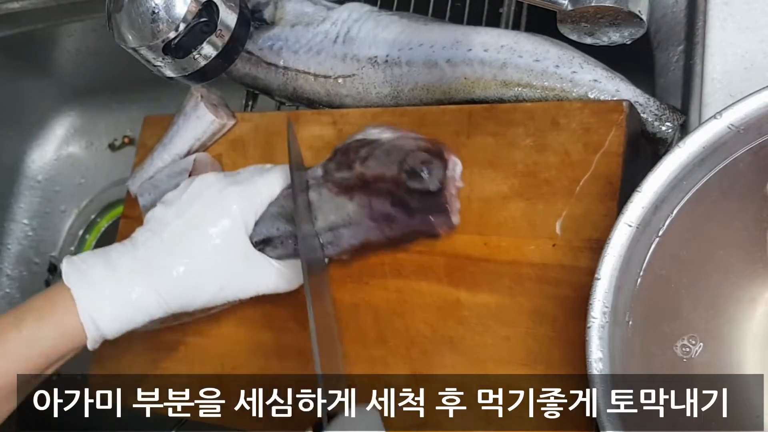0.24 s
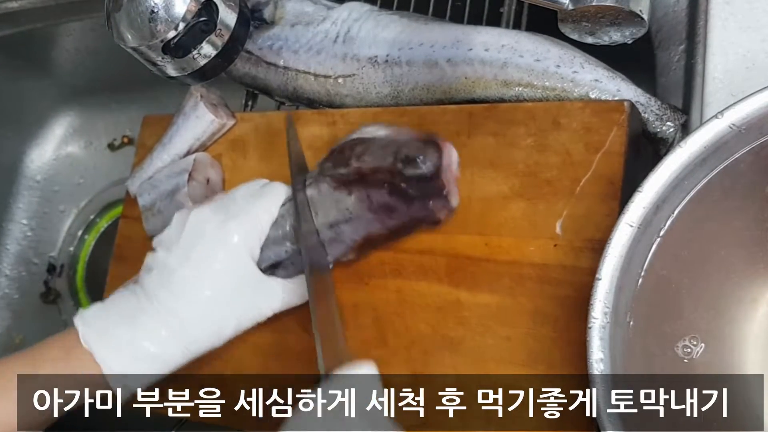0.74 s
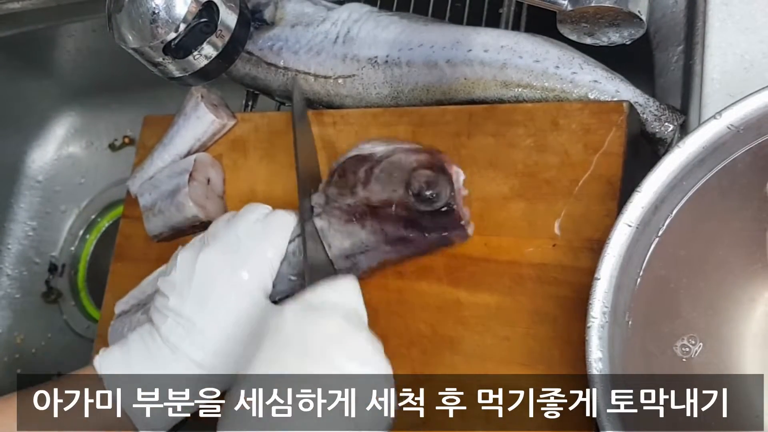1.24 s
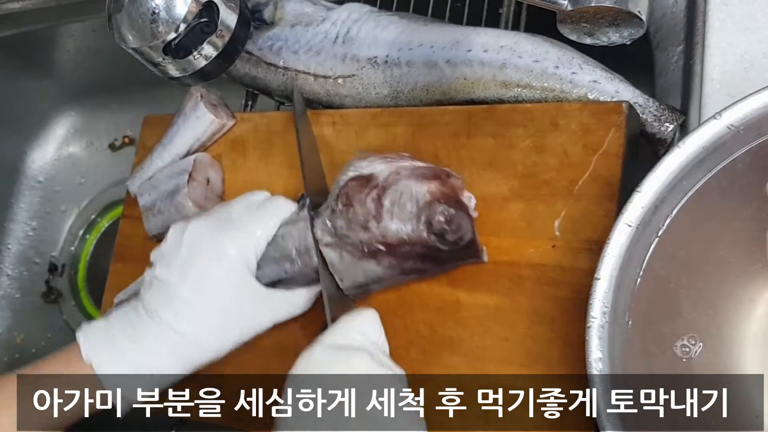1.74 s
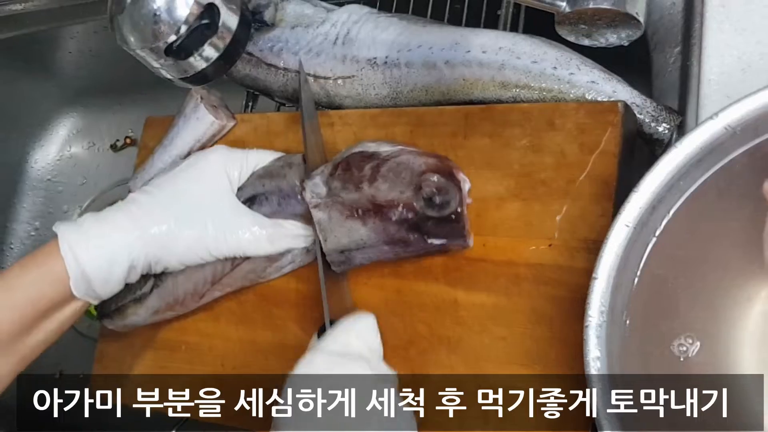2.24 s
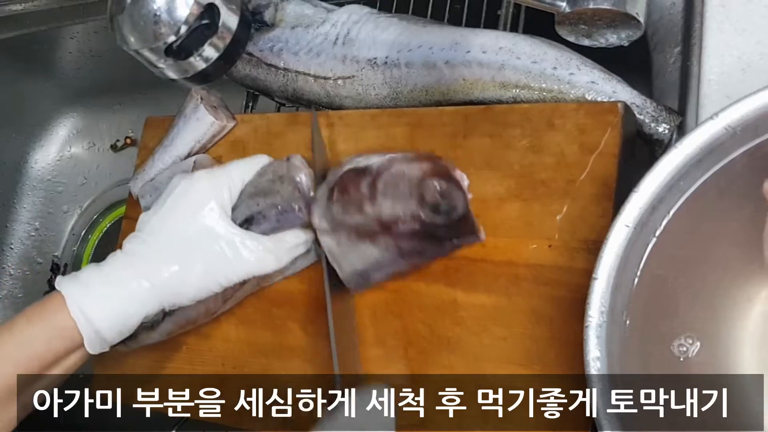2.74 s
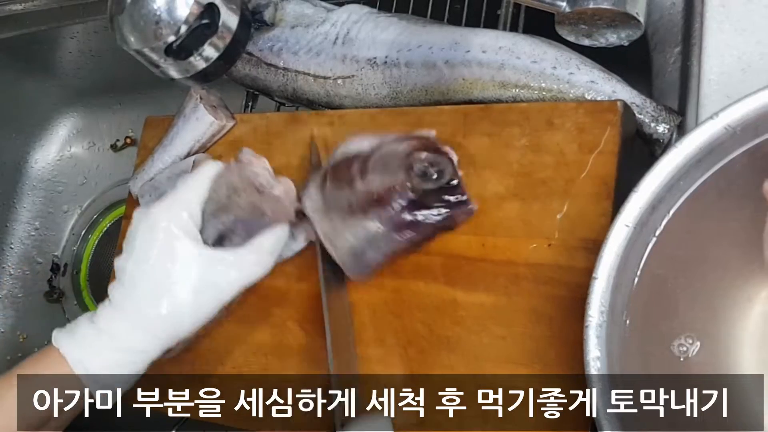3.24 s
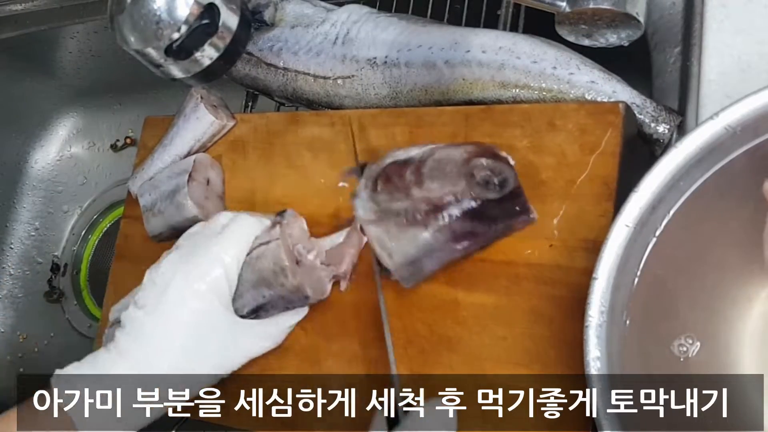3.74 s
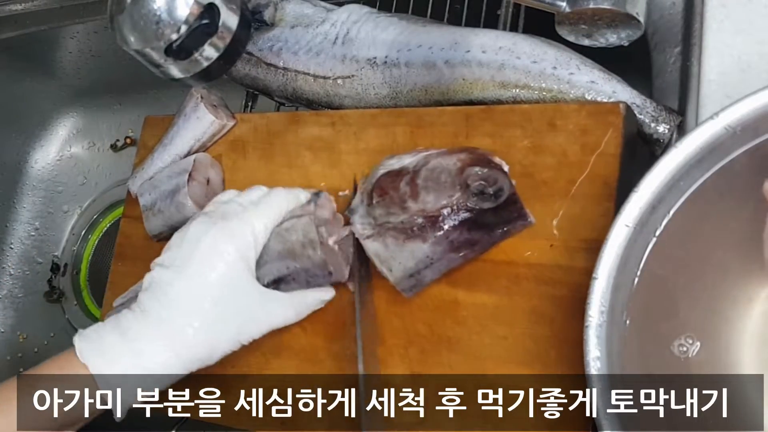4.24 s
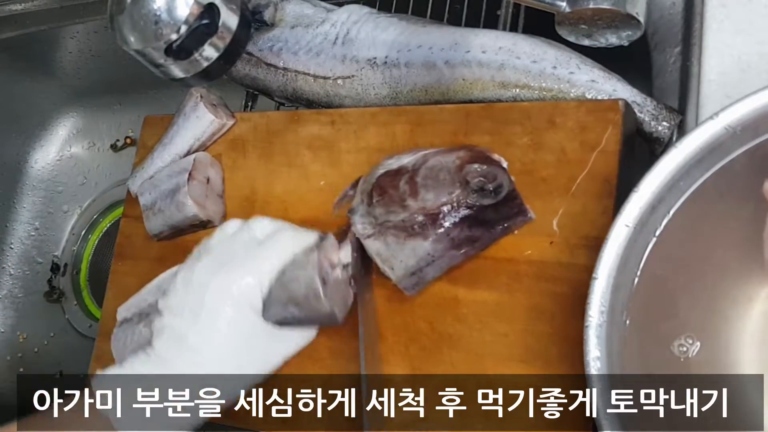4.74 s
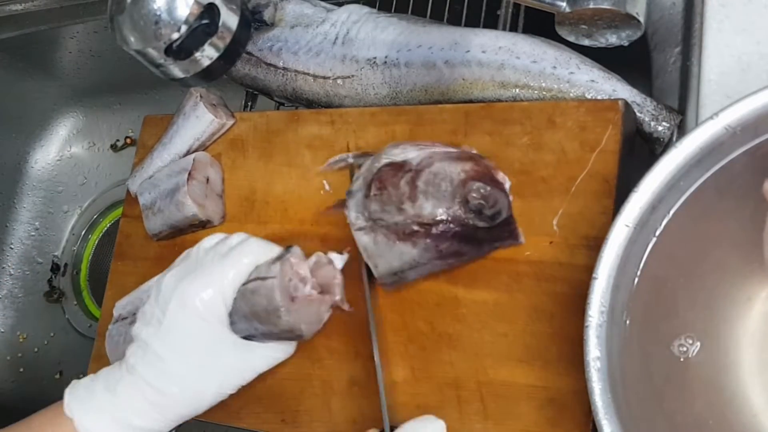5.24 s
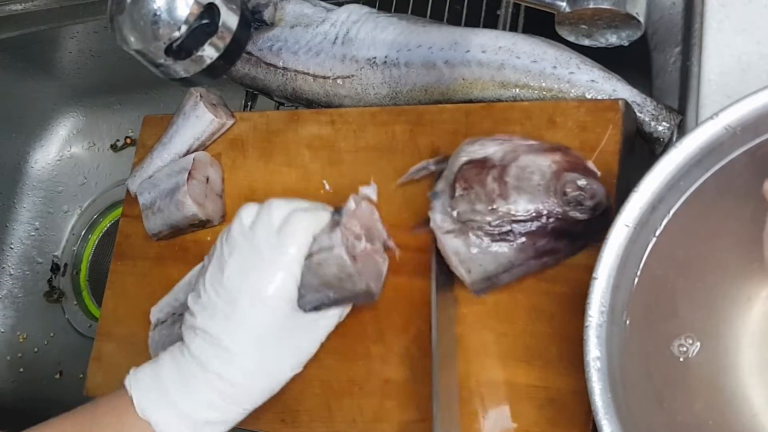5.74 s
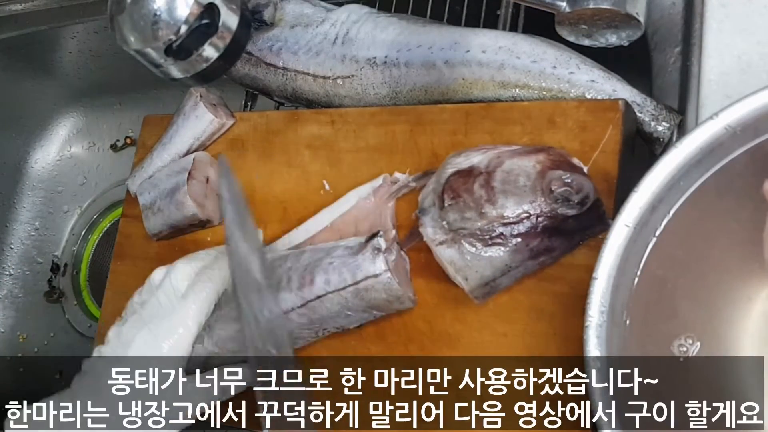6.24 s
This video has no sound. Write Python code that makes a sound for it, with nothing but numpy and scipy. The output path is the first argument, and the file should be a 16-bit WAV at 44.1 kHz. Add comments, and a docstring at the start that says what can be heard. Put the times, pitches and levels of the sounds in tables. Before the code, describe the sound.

Very close in a tiled kitchen, a knife works through a fish on a wooden board over a sink. Wet, gritty strokes rasp and hiss, bones crack sharply around one and a half and two seconds, then hollow knocks and low rubbing drags take over. After a last thump near five seconds it thins to faint scrapes and quiet air.

```python
"""A kitchen knife saws through a thawed fish on a wooden board laid over a steel sink, close to two microphones.
The slot round the blade sings and crunches through the board modes; wet skin hisses as unsteady noise.
Bones and scales snap as short noise bursts, and blows excite the board's resonances.
The fish drags on the wood as low-passed friction and rubbed tones.
A tiled kitchen answers snaps and knocks with decaying noise tails, over a faint hush of air."""
import sys
import numpy as np
from scipy import signal
from scipy.fft import rfft, irfft, next_fast_len
from scipy.io import wavfile
from scipy.ndimage import uniform_filter1d, map_coordinates

SR = 44100
rng = np.random.default_rng(int(sys.argv[2]) if len(sys.argv) > 2 else 0)


def to_wav(s):
    """Save 16-bit WAV."""
    ch = np.atleast_2d(s).T  # columns
    pcm = np.round(np.clip(ch, -1, 1) * 32767)  # PCM
    wavfile.write(sys.argv[1], SR, pcm.astype(np.int16))


N = 286046  # samples
STEP = 16  # samples between envelope points
TICK_DB = -14  # fibre ticks against the friction noise

# Strokes and bites of the blade: (time of full strength [s], rise [s], hold [s], fade [s],
# relative crunch level [dB], pitch of the cut [Hz], relative hiss level [dB], sizzle against hiss [dB])
STROKES = [(0.075, 0.02, 0.012, .04, -52, 2090, -71, -11), (0.098, 0.068, 0.051, .13, -48.5, 1065, -51, -4),
           (0.327, 0.15, 0.046, 0.1, -59, 1073, -62.5, 6),
           (0.455, 0.0036, 0.021, .12, -42, 1070, -54.5, 6.5),
           (0.52, 0.053, 0.015, 0.14, -45, 1200, -48, -3.5),
           (0.64, 0.0055, 0.006, 0.18, -50.5, 1282, -56.5, -6),
           (0.7, 0.11, 0.052, 0.12, -54, 1251, -57.5, -1.5),
           (0.908, 0.066, 0.042, 0.097, -45.5, 1280, -45, -1),
           (1.063, 0.0037, 0.0026, .08, -56, 1273, -48.5, -5.5),
           (1.127, 0.14, 0.009, 0.17, -50.5, 1477, -51, -0.5),
           (1.273, 0.033, 0.055, 0.085, -52.5, 1278, -56, -3),
           (1.344, 0.0055, 0.013, .09, -40.5, 1500, -41.5, -3.5),
           (1.379, .02, 0.009, 0.088, -37, 1515, -40, 2.5),
           (1.474, 0.027, 0.009, 0.14, -40.5, 1486, -38, -3),
           (1.542, 0.076, 0.041, 0.11, -46, 1763, -59.5, -5),
           (1.697, 0.072, 0.034, .1, -50.5, 1723, -60, 3),
           (1.735, 0.052, 0.032, 0.19, -39.5, 997, -46.5, -1),
           (1.933, 0.21, 0.015, 0.22, -49.5, 1498, -55, -2.5),
           (2.184, 0.033, 0.0093, 0.23, -48.5, 1108, -48, -0.5),
           (2.225, 0.054, .005, 0.13, -40.5, 1423, -40.5, -4.5),
           (2.299, 0.12, 0.0069, 0.08, -45.5, 1090, -45, -3),
           (2.358, 0.042, 0.0053, 0.39, -55, 1201, -55.5, -1.5),
           (2.615, 0.053, 0.033, .1, -54.5, 888, -61, -9.5),
           (2.67, 0.014, 0.0052, 0.16, -35.5, 880, -36, -2),
           (2.727, 0.097, 0.027, .05, -38.5, 1079, -62, 5.5), (2.8, 0.034, 0.018, 0.12, -42, 1030, -53, 2),
           (2.859, 0.0575, 0.021, 0.14, -37.5, 871.6, -43, -10),
           (2.942, 0.11, 0.0056, 0.1, -50, 873, -49, -1.5),
           (3.125, 0.22, 0.016, 0.24, -42, 868, -52.5, -4.5),
           (3.282, .01, 0.0054, 0.15, -53.5, 892, -81, -14.5),
           (3.355, 0.19, 0.086, 0.069, -60, 906, -62.5, -10),
           (3.523, 0.023, 0.0074, 0.048, -48, 883, -67, -7.5),
           (3.552, 0.047, 0.037, 0.14, -44, 860, -53, -3), (3.795, 0.9, 0.11, 0.16, -64.5, 1039, -69, -1.5),
           (4.087, 0.014, 0.0048, 0.12, -48.5, 1003, -105, -5),
           (4.324, 0.14, .005, 0.22, -81.5, 1004, -70.5, -3),
           (4.566, 0.12, 0.017, 0.22, -51.5, 1051, -57.5, -5),
           (4.69, 0.066, 0.0202, .09, -61, 877, -68, -2), (4.821, 0.063, 0.022, .1, -53.5, 1051, -62, -3),
           (4.983, 0.12, 0.033, 0.14, -42.5, 1092, -58.5, -1),
           (5.057, 0.2, 0.0048, 0.11, -48, 967, -47.5, -2.5),
           (5.151, 0.043, 0.0042, 0.27, -53.5, 950, -66.5, -2),
           (5.38, .02, 0.027, 0.22, -71, 1564, -75.5, 0.5), (5.505, 0.11, .12, .1, -78, 1530, -82, -4),
           (5.679, 0.15, 0.037, .1, -71, 2112, -88, -0.5),
           (5.709, 0.031, 0.0088, 0.21, -70, 1570, -68.5, 3.5),
           (5.968, 0.18, 0.045, 0.24, -83.5, 1258, -70, 1)]
# Resonances of the board and the sink under it: (frequency [Hz], bandwidth [Hz], gain [dB])
BOARD = [(56.2, 9.7, -6.5), (132.6, 41.7, -1), (161.1, 34.6, 3), (221.5, 7.1, 3), (285.6, 18.6, -1.5),
         (340.8, 21, -3), (414.5, 31, -8.5), (471.7, 31, -5.5), (533, 96, -11), (805, 71, -6),
         (873, 92, -6), (1077, 73, -4.5), (1252, 110, -6.5), (1470, 63, -2), (1596, 170, -7),
         (1937, 160, -7.5), (2128, 70, -8.5), (2433, 270, -11)]


def cut():
    """Friction-excited resonance: the slot sings at each stroke's pitch and crunches through nearby board modes."""
    stroke_db, stroke_hz = np.transpose(STROKES)[4:6]
    sing_db = level(STROKES, stroke_db) - 5
    out = ring(sing_db, pitch(STROKES, stroke_db, stroke_hz), wander=0.017, pan_db=0.0)

    # Each stroke shares its crunch power between the two board modes that bracket its pitch.
    steps = [hz for hz, width_hz, db in BOARD[10:18]]
    place = np.interp(np.log(stroke_hz), np.log(steps), np.arange(len(steps)))
    drive = grit(150, spread_db=2.0, patchy_db=3.0)
    for k, hz in enumerate(steps):
        share_db = 10 * np.log10(np.clip(1 - np.abs(place - k), 1e-6, 1))

        def slot(f):
            """A narrow and a broad resonance in cascade with the board modes."""
            narrow = mode(f, hz, 0.23 * hz) ** 2
            broad = mode(f, 1.15 * hz, 1.8 * hz) ** 2
            return wood(f) * (narrow + 0.3 * broad)

        out = out + spread(drive, level(STROKES, stroke_db + share_db) - 0.7, slot, pan_db=5.0)
    return out


def skin():
    """Broadband friction noise: wet skin hisses along the blade; tiny bubbles sizzle above it."""
    # Spectrum of the hiss: (frequency [Hz], relative density [dB])
    hiss_spectrum = [(1200, -38.5), (2000, -2), (2800, -2.5), (4800, -1.5), (7000, -6.5), (9000, -10),
                     (12000, -26.5)]
    # Spectrum of the sizzle: (frequency [Hz], relative density [dB])
    sizzle_spectrum = [(5000, -14), (7500, -8), (9500, -6), (11600, -3), (12500, -3.5), (13500, -3),
                       (15700, -8)]
    stroke_db, above_db = np.transpose(STROKES)[6:]
    hiss_db = level(STROKES, stroke_db) + 1.5
    sizzle_db = level(STROKES, stroke_db + above_db) + 3.5
    hiss_drive = grit(300, spread_db=1.5, patchy_db=3.5) + amp(TICK_DB) * ticks()
    hiss = spread(hiss_drive, hiss_db, lambda f: amp(along(hiss_spectrum, f)), pan_db=2.5)
    sizzle_drive = grit(440, spread_db=1.0, patchy_db=3.0) + amp(TICK_DB) * ticks()
    sizzle = spread(sizzle_drive, sizzle_db, lambda f: amp(along(sizzle_spectrum, f)), pan_db=1.5)
    return hiss + sizzle


def ticks():
    """A Poisson-like train: small fibres tear at random moments, each a noise burst of about half a millisecond."""
    ticks_per_s, size_spread_db = 250, 5
    when = rng.random(N) < ticks_per_s / SR
    size = amp(size_spread_db * rng.standard_normal(N))
    burst = uniform_filter1d(when * size, size=24)
    return unit(burst * rng.standard_normal((2, N)))


def snaps():
    """Brittle fracture: each break is a sharp noise burst with three decay rates, some duller, some brighter."""
    # Bones and scales breaking: (time [s], relative level [dB], relative treble level [dB])
    breaks = [(0.061, -44, -27), (0.4573, -33.5, 0.5), (0.606, -38.5, -32.5), (0.65, -31, -12.5),
              (0.9096, -24, -7.5), (1.059, -39, -7.5), (1.3376, -26, 6.5), (1.3523, -31, 2),
              (1.384, -35, 4.5), (1.472, -29.5, 0.5), (1.474, -18.5, 7.5), (1.4802, -14.5, -10.5),
              (1.7945, -24, -5.5), (2.163, -44, -3), (2.1843, -25, -5.5), (2.2007, -21, -17),
              (2.2308, -16, -24), (2.2947, -25.5, -10.5), (2.2981, -28, -26), (2.674, -23.5, -10.5),
              (2.7373, -33, -3), (2.813, -27.5, -4.5), (2.8647, -39.5, -17.5), (2.947, -32, 0.5),
              (3.418, -44, -20), (3.5747, -32.5, -12), (3.8639, -44, -14.5), (5.056, -30, -18.5),
              (5.378, -44.5, -14.5)]
    attack_s = 0.00015
    out = np.zeros((2, N + SR))
    t = np.arange(SR // 10) / SR
    f = np.fft.rfftfreq(len(t), 1 / SR)
    # Each part falls 60 dB in the time that divides it [s].
    decay = 0.22 * amp(-60 * t / 0.0046) + 0.5 * amp(-60 * t / 0.017) + 0.036 * amp(-60 * t / 0.089)
    envelope = decay * (1 - np.exp(-t / attack_s))
    for s, db, top_db in breaks:
        burst = rng.standard_normal((2, len(t))) * envelope
        colour = mode(f, 5300, 3700) - amp(top_db + 11.0) * mode(f, 17000, 3700)
        out[:, round(s * SR):][:, :len(t)] += amp(db + 2.5) * irfft(rfft(burst) * colour, len(t))
    return out[:, :N] * amp([[.9], [-.9]])  # left is 1.8 dB louder


def knocks():
    """Impact excitation: a push and a short rattle; the harder the contact, the higher the modes that ring."""
    # Blade or fish striking the wood: (time [s], relative strength [dB], centre of the blow [Hz])
    blows = [(0.456, -36.5, 1080), (0.649, -44, 1300), (1.339, -58, 1498), (1.38, -31, 1510),
             (1.513, -44, 1550), (1.747, -18.5, 373), (1.796, -32, 1540), (2.598, -31.5, 326),
             (2.66, -21.5, 591), (2.941, -23, 847), (3.148, -27.5, 1480), (3.281, -19.5, 530.5),
             (3.547, -33.5, 840), (4.0911, -27.5, 539.4), (4.984, -27, 901), (5.001, -24.5, 448),
             (5.055, -23, 850), (5.378, -51.5, 1587)]
    push = np.zeros(N + SR)
    t = np.arange(SR // 5) / SR
    f = np.fft.rfftfreq(len(t), 1 / SR)
    for s, db, hz in blows:
        blow = 0.021 * rng.standard_normal(len(t)) * amp(-60 * t / 0.32)
        blow[0] = 1  # the push, ahead of the rattle
        contact = mode(f, hz, 1.19 * hz) ** 2 / (1 + 1j * f / 2000) ** 3
        blow = irfft(rfft(blow) * contact, len(t))
        push[round(s * SR):][:len(t)] += amp(db + 23.5) * blow / np.linalg.norm(blow)
    # The 0.2 is the blow heard directly, beside the board's modes.
    return filtered(push[:N], lambda f: (wood(f) + 0.2) * ports(f, pan_db=3.5))


def drag():
    """Sliding friction: soft flesh pushes only the low modes of the board, and each shove sets tones singing."""
    # The fish shoved along the wood: (time of full strength [s], rise [s], hold [s], fade [s],
    # relative drone level [dB], relative rumble level [dB], pitch of the rumble [Hz])
    shoves = [(.002, 0.18, 0.17, 0.32, -52, -56.5, 336.7), (0.47, .02, 0.09, 0.24, -50.5, -52, 300),
              (0.696, 0.061, 0.055, 0.42, -55, -54, 298), (0.928, 0.18, .005, 0.57, -51.5, -57.5, 297),
              (1.381, 0.056, 0.041, 0.22, -36.5, -43, 301.7), (1.731, 0.025, 0.0036, 0.72, -53, -43.5, 330),
              (1.811, 0.13, 0.011, 0.13, -36.5, -60.5, 330), (2.191, 0.035, 0.077, 0.25, -35, -46, 360),
              (2.599, .04, 0.049, 0.21, -44, -47, 310.2), (2.658, 0.025, 0.065, 0.11, -34, -33.5, 311.2),
              (2.841, 0.14, 0.03, 0.17, -43.5, -37, 338.4), (3.013, 0.78, 0.011, 0.63, -43, -53.5, 340.9),
              (3.096, 0.052, 0.0059, 0.26, -55, -37, 323.7), (3.286, .02, 0.0056, 0.22, -36, -36.5, 291.7),
              (3.384, .05, 0.015, 0.093, -48, -44, 321), (3.527, 0.12, 0.0045, 0.37, -59, -45, 330),
              (3.599, 0.1, .04, 0.33, -42, -44.5, 212.7), (3.926, 0.084, 0.0058, 0.131, -47.5, -57, 299.4),
              (4.094, 0.023, 0.035, 0.26, -43.5, -42.5, 292), (4.56, 0.13, 0.0044, 0.42, -49, -52, 309.2),
              (4.83, 0.11, 0.0047, 0.36, -49.5, -49.5, 420), (4.993, 0.097, 0.069, 0.16, -37, -40, 330.2),
              (5.17, 0.061, 0.033, 0.12, -52, -48, 320), (5.342, 0.092, 0.051, 0.16, -55.5, -63, 312),
              (5.58, 0.19, 0.016, 0.22, -67.5, -68.5, 326), (5.887, 0.12, 0.0051, 0.36, -84, -65.5, 329),
              (6.218, 0.083, 0.0057, 0.15, -67.5, -67, 331)]
    drone_hz = 156.5
    drone_rows_db, rumble_rows_db, rumble_rows_hz = np.transpose(shoves)[4:]
    drone_db = level(shoves, drone_rows_db)
    rumble_db = level(shoves, rumble_rows_db)
    rumble_hz = pitch(shoves, rumble_rows_db, rumble_rows_hz)

    def drone(f):
        """Board modes low-passed at 200 Hz and high-passed at 35 Hz."""
        return wood(f) / (1 + 1j * f / 200) ** 4 * (1j * f / (35 + 1j * f)) ** 2

    def rumble(f):
        """Board modes through a broad resonance."""
        return wood(f) * mode(f, 389, 480) ** 2

    return (spread(grit(40, spread_db=0.5, patchy_db=1.0), drone_db - 3.5, drone, pan_db=2.5)
            + spread(grit(60, spread_db=1.5, patchy_db=1.5), rumble_db - 2.0, rumble, pan_db=3.5)
            + ring(drone_db - 4.5, drone_hz, wander=0.04985, pan_db=2.0)
            + ring(rumble_db - 6.5, rumble_hz, wander=0.02457, pan_db=4.0))


def kitchen(x):
    """Reverberation: each frequency of a noise tail dies at its own speed; a new tail every third of a second."""
    # Reverberation time of the room: (frequency [Hz], time to fall 60 dB [s])
    decay_times = [(100, .4), (500, 0.18), (2000, 0.2), (12000, 0.47)]
    out, step = np.zeros((2, N + 2 * SR)), SR // 3
    for a in range(0, N, step):
        hz, t, z = signal.stft(rng.standard_normal((2, SR // 2)), SR, nperseg=256)
        decay = amp(-60 * t / along(decay_times, hz)[:, None])
        tail = signal.istft(z * decay, SR, nperseg=256)[1]
        wet = signal.fftconvolve(x[:, a:a + step], tail / np.linalg.norm(tail[0]), axes=1)
        out[:, a + 130:][:, :wet.shape[1]] += wet  # the answer starts 130 samples late
    return out[:, :N]


def hush():
    """Stationary background noise: the quiet air of the kitchen, shaped by its spectrum."""
    # Spectrum of the air: (frequency [Hz], relative density [dB])
    air_spectrum = [(15, -43), (25, -3), (133, 0.5), (261, -7), (342, -2.5), (707, -16.5), (1280, -14),
                    (2250, -26), (6990, -29.5), (12300, -27.5), (15700, -28)]
    air = grit(6, spread_db=1.5, patchy_db=1.5)
    return spread(air, -68.5, lambda f: amp(along(air_spectrum, f)), pan_db=4.5)


def ring(level_db, hz, wander, pan_db):
    """Rubbed resonance: a tone whose pitch wanders by a share of itself and whose strength flickers."""
    rate = 45  # random values a second
    knots = rng.standard_normal((2, int(N * rate / SR) + 4))
    drift, flicker = (map_coordinates(row, [np.arange(N) * rate / SR]) for row in knots)
    phase = 2 * np.pi * np.cumsum(hz * (1 + wander * drift)) / SR
    tone = unit(amp(4.0 * flicker) * np.sin(phase))
    # The faster the pitch glides, the quieter the tone.
    leap_db = -1.5 * SR * np.abs(np.gradient(np.log(hz + np.zeros(N))))
    return filtered(tone * amp(level_db + leap_db), lambda f: ports(f, pan_db))


def grit(rate, spread_db, patchy_db):
    """Irregular friction: two noises in patches of colour, their strength moving between rate random values a second."""
    z = signal.stft(rng.standard_normal((2, N)), nperseg=512)[2]
    field = rng.standard_normal(z.shape[1:])
    field = uniform_filter1d(uniform_filter1d(field, size=5, axis=0), size=5, axis=1)
    pair = signal.istft(z * amp(patchy_db * unit(field)), nperseg=512)[1][:, :N]
    knots = rng.standard_normal(int(N * rate / SR) + 4)
    jumps = map_coordinates(knots, [np.arange(N) * rate / SR], order=1)
    return unit(amp(spread_db * jumps) * pair)


def wood(f):
    """Modal superposition: the resonances of the board, neighbours in opposite phase."""
    return sum((-1) ** k * amp(db) * mode(f, hz, width) for k, (hz, width, db) in enumerate(BOARD))


def mode(f, hz, width_hz):
    """Damped oscillator: one causal resonance, gain 1 at its centre."""
    return 1j * f * width_hz / (hz * hz - f * f + 1j * f * width_hz + 1e-9)


def swells(rows, level_db):
    """Stick-slip motion: power of each row through rise, hold and fade, stalling before a jerk and leaping at it."""
    # The stuck blade lets go: time [s]
    jerks = [0.061, 0.454, 0.648, 0.869, 1.056, 1.268, 1.335, 1.379, 1.47, 1.746, 2.188, 2.598, 2.659, 2.81,
             2.854, 3.279, 3.511, 3.549, 4.091, 4.824, 4.922, 5.381, 5.709]
    stick_s, slip_s = 0.018, 0.00991  # stall before a jerk, leap ahead at it
    swing_db = 30  # climb over the rise time, fall over the fade time
    s, rise, hold, fade = np.abs(np.array(rows)[:, :4, None]).transpose(1, 0, 2)
    t = clock = np.arange(0, N + STEP, STEP) / SR
    for jerk in jerks:
        near = (clock > jerk - stick_s) & (clock < jerk + slip_s)
        held = np.where(clock < jerk, jerk - stick_s, jerk + slip_s)
        t = np.where(near, held, t)
    below = np.maximum(np.maximum((s - t) / rise, (t - s - hold) / fade), 0)
    return amp(2 * np.maximum(level_db[:, None] - swing_db * below, -150))  # doubled dB: power


def level(rows, level_db):
    """Incoherent addition: the powers of all rows summed, in dB per sample."""
    return fine(10 * np.log10(swells(rows, level_db).sum(axis=0)))


def pitch(rows, level_db, hz):
    """Dominance by power: the pitch of the loudest rows, gliding from one to the next."""
    power = swells(rows, level_db) ** 3  # cubed, so the loudest row prevails
    return fine((power * hz[:, None]).sum(axis=0) / power.sum(axis=0))


def fine(coarse):
    """Linear interpolation: envelope points to one value per sample."""
    return np.interp(np.arange(N) / STEP, np.arange(len(coarse)), coarse)


def spread(pair, level_db, response, pan_db):
    """Interchannel coherence: two drives through a body as mid and side, in shares that set the likeness."""
    # Likeness of the two channels: (frequency [Hz], left-right correlation [0 to 1])
    likeness = [(60, 0.96), (250, 0.9), (550, 0.69), (1100, 0.8), (2500, 0.15), (15000, 0.13)]
    m = next_fast_len(N + SR // 4, real=True)
    f = np.fft.rfftfreq(m, 1 / SR)
    turn = np.arccos(np.clip(along(likeness, f), -1, 1)) / 2
    body = response(f)
    body = unit(np.abs(body)) * np.exp(1j * np.angle(body))
    mid, side = rfft(pair * amp(level_db), m) * body * [np.cos(turn), np.sin(turn)]
    return irfft(np.array([mid + side, mid - side]) * ports(f, pan_db), m)[:, :N]


def ports(f, pan_db):
    """Interchannel level and phase: left is louder by pan_db and leads."""
    # Phase between the microphones: (frequency [Hz], lead of the left [rad])
    left_lead = [(100, 0.06), (750, 0.45), (1050, 1.4), (3000, 0.95)]
    half = np.array([[.5], [-.5]])
    return amp(pan_db * half) * np.exp(1j * half * along(left_lead, f))


def filtered(x, response):
    """Linear filtering: x times a complex response of frequency."""
    m = next_fast_len(N + SR // 2)
    return irfft(rfft(x, m) * response(np.fft.rfftfreq(m, 1 / SR)), m)[..., :N]


def along(points, hz):
    """Logarithmic frequency scale: values interpolated between (frequency, value) points."""
    f, v = np.transpose(points)
    return np.interp(np.log(hz + 1), np.log(f + 1), v)


def unit(x):
    """Power normalisation: x scaled to rms 1."""
    return x / np.sqrt(np.mean(x ** 2) + 1e-20)


def amp(db):
    """Logarithmic level: decibels to gain."""
    return 10 ** (np.asarray(db) / 20)


def scene():
    """Superposition: snaps and knocks with their echoes, over the sawing and the hush."""
    hits = snaps() + knocks()
    return hits + amp(-8.0) * kitchen(hits) + drag() + cut() + skin() + hush()


def record(dry):
    """Band limitation: the sound drops 36.5 dB from 15.8 kHz and ends at 16.9 kHz."""
    return filtered(dry, lambda hz: (hz < 16900) * np.where(hz < 15800, 1, amp(-36.5)))


dry = scene()
out = record(dry)
to_wav(out)
```